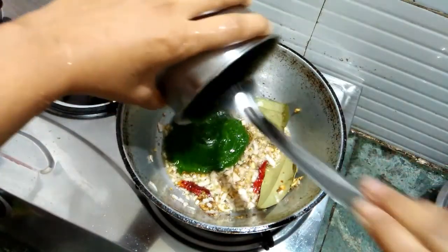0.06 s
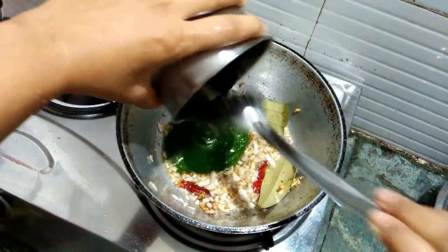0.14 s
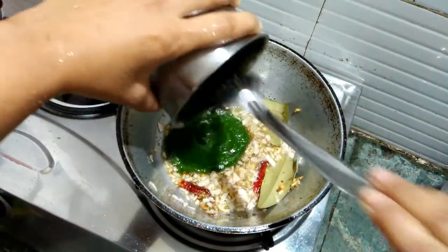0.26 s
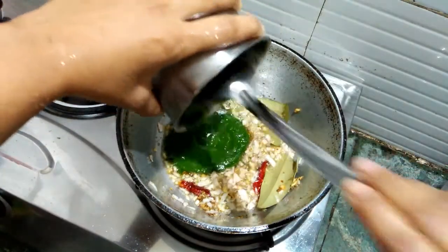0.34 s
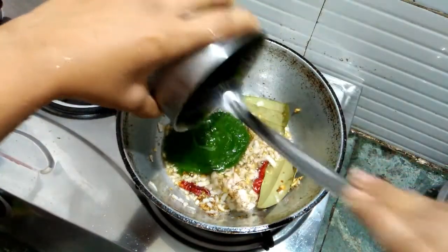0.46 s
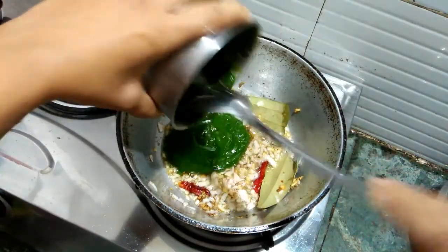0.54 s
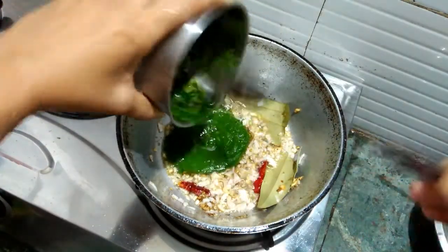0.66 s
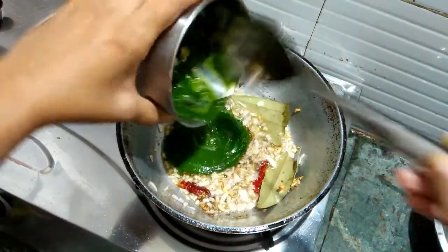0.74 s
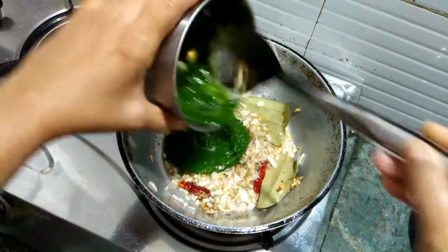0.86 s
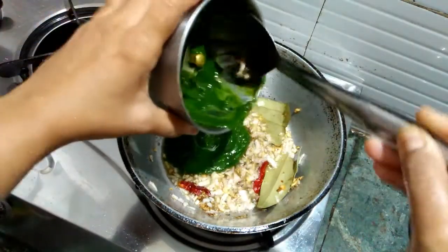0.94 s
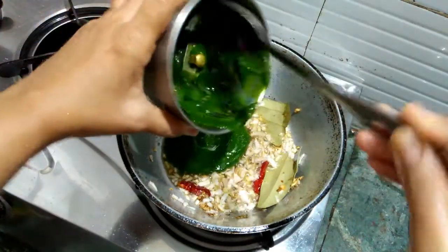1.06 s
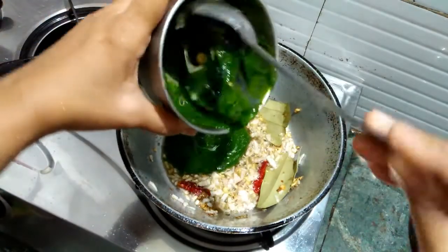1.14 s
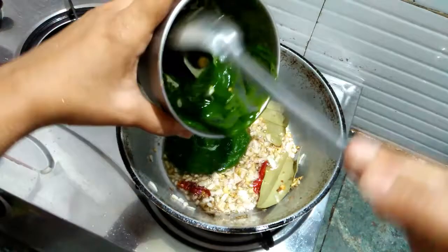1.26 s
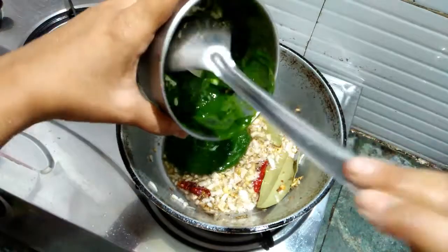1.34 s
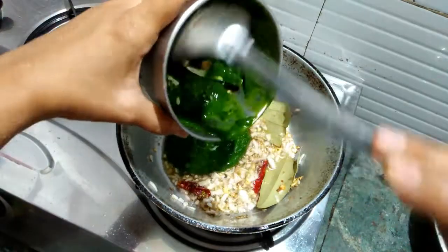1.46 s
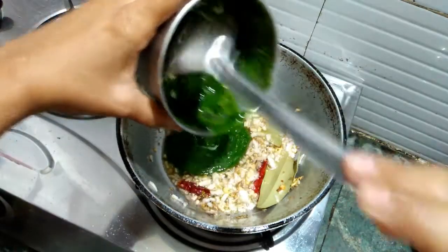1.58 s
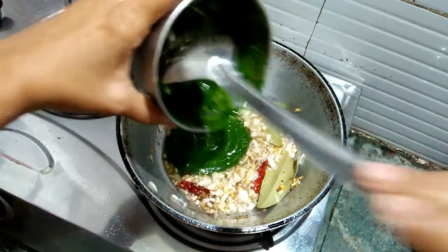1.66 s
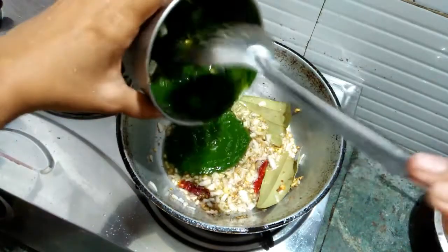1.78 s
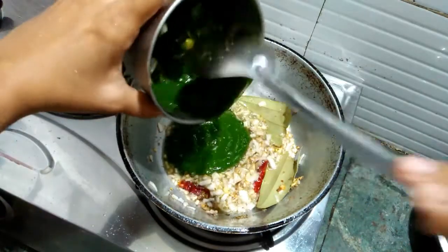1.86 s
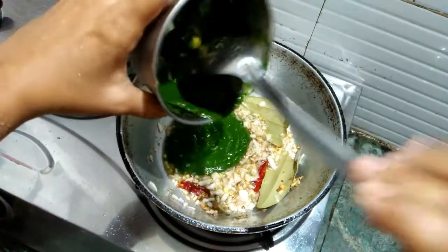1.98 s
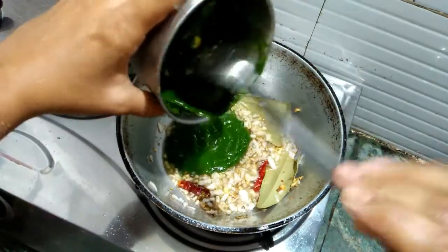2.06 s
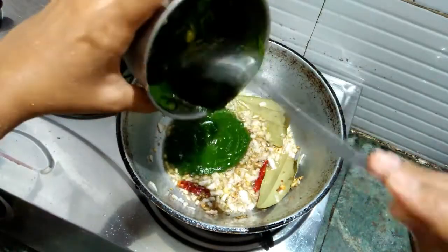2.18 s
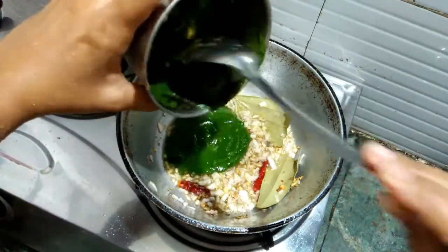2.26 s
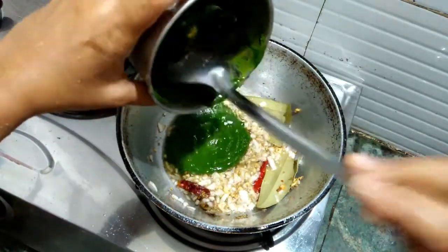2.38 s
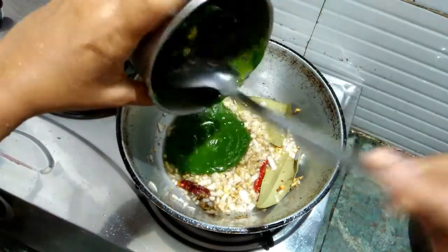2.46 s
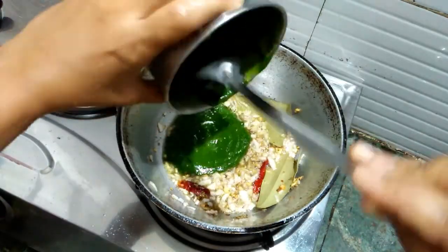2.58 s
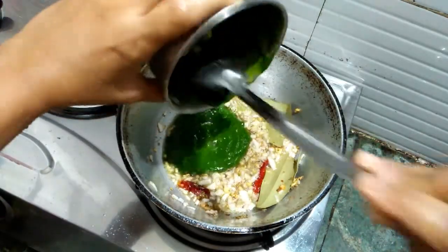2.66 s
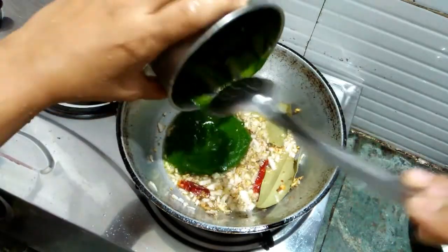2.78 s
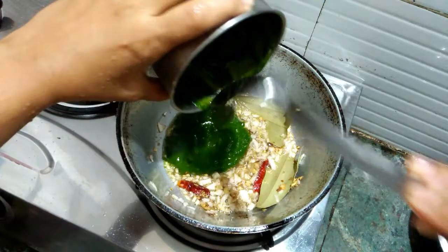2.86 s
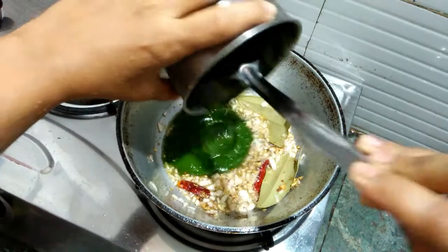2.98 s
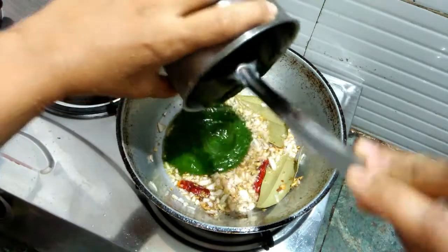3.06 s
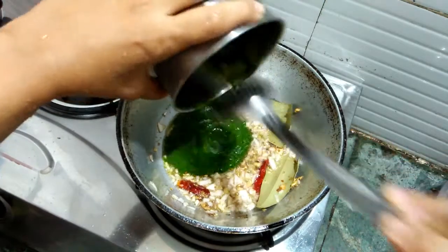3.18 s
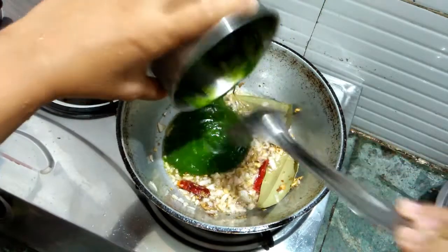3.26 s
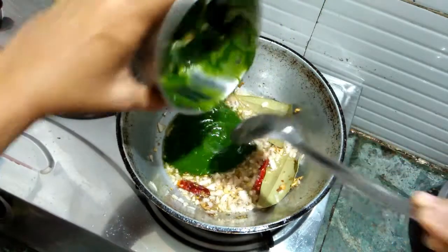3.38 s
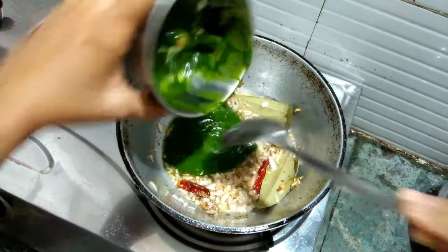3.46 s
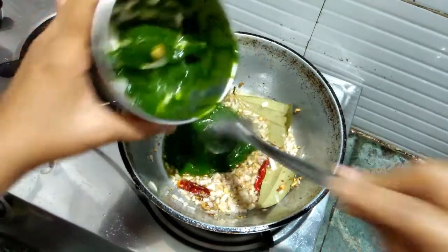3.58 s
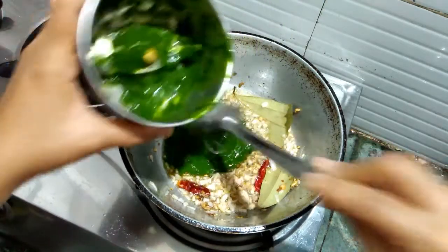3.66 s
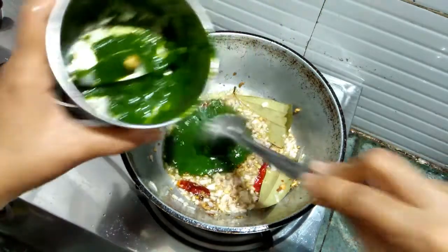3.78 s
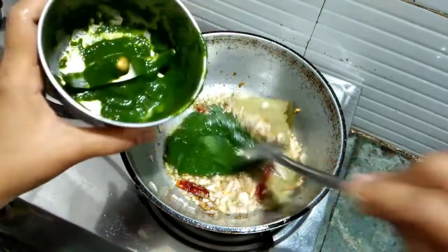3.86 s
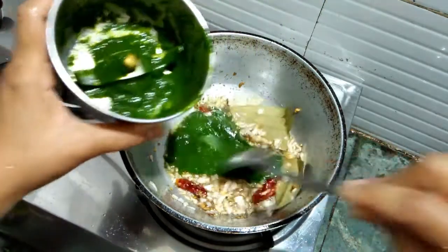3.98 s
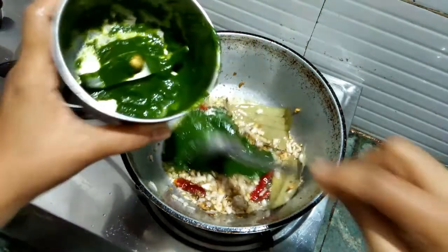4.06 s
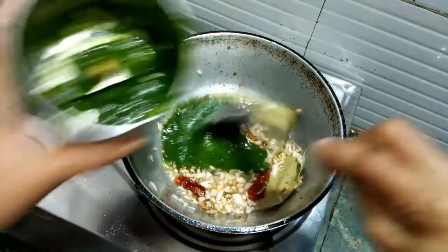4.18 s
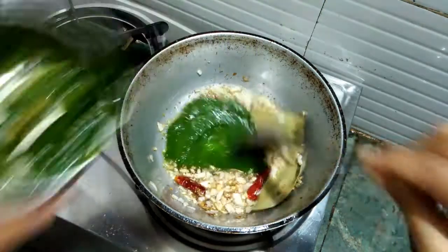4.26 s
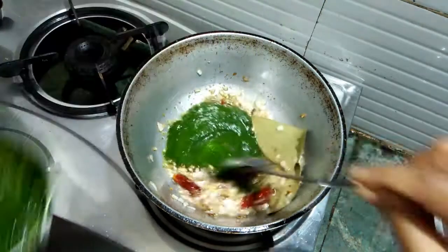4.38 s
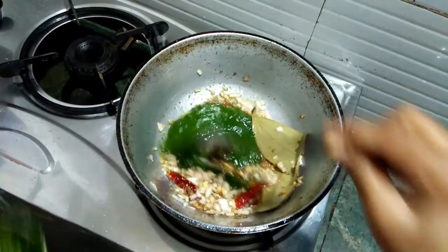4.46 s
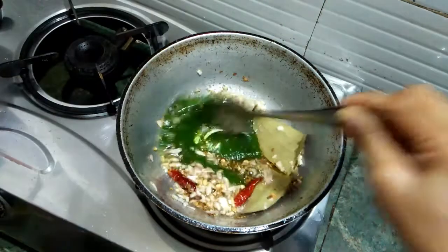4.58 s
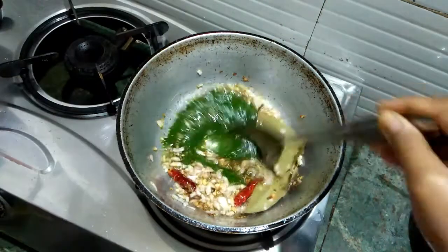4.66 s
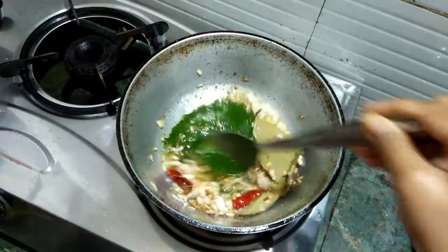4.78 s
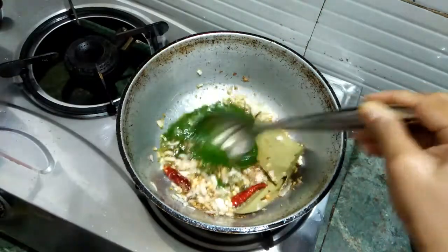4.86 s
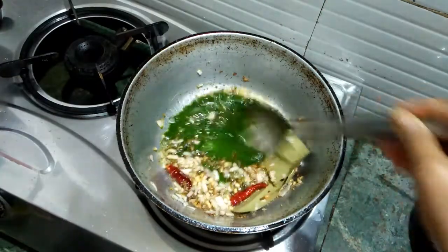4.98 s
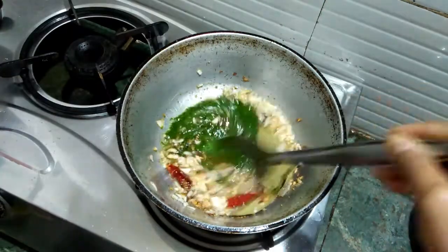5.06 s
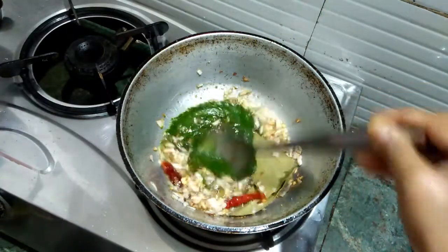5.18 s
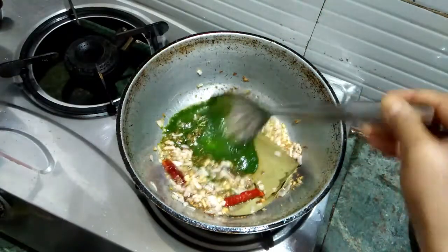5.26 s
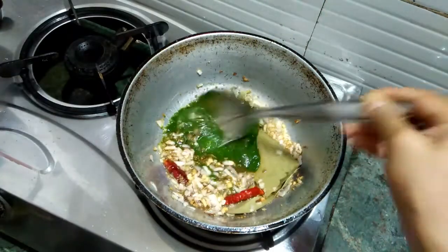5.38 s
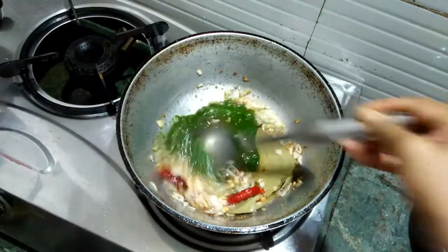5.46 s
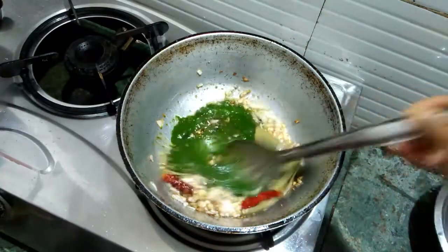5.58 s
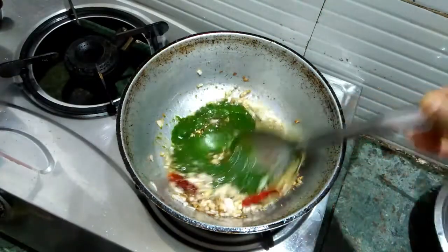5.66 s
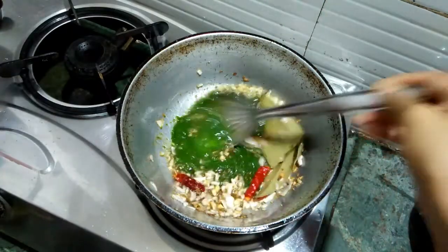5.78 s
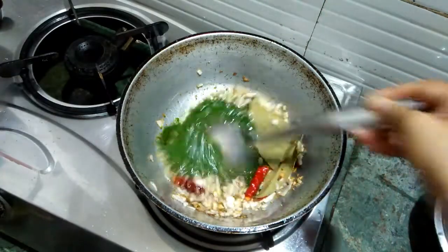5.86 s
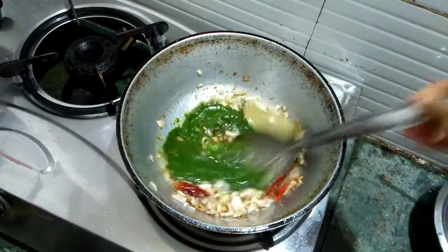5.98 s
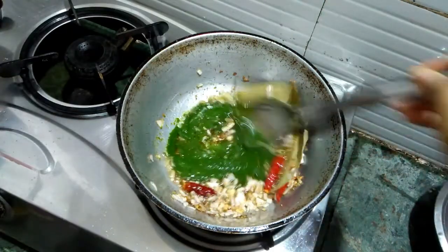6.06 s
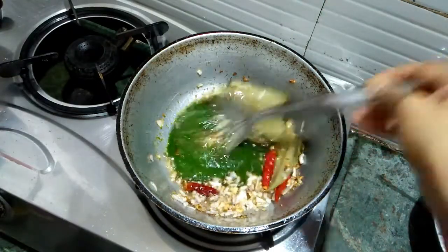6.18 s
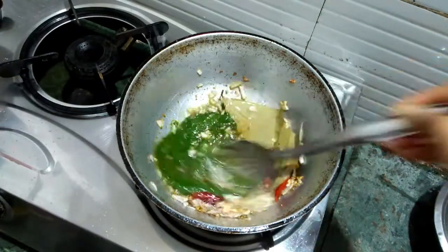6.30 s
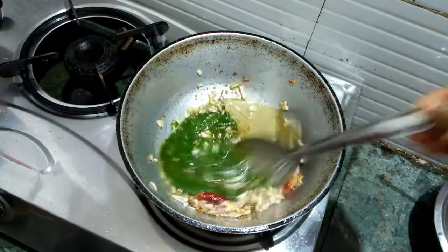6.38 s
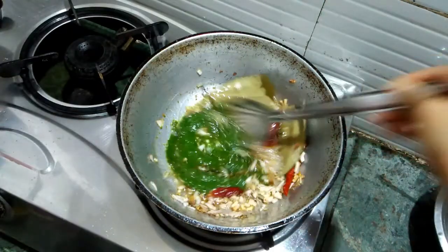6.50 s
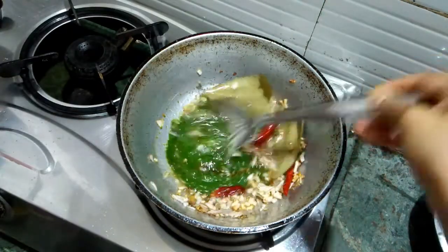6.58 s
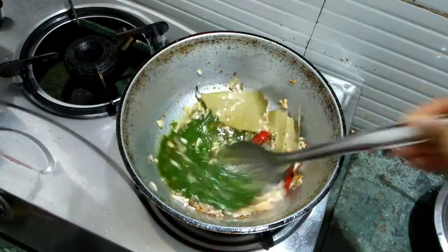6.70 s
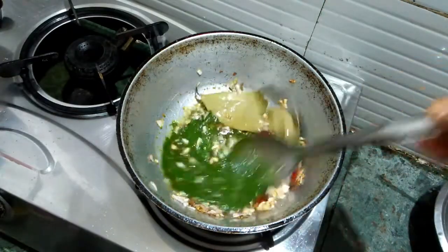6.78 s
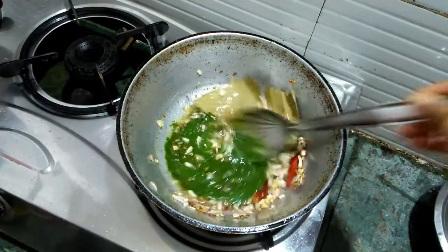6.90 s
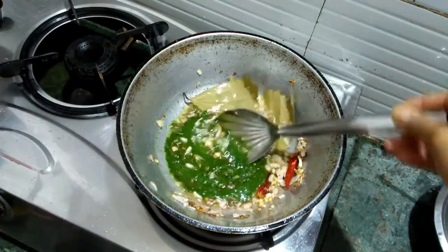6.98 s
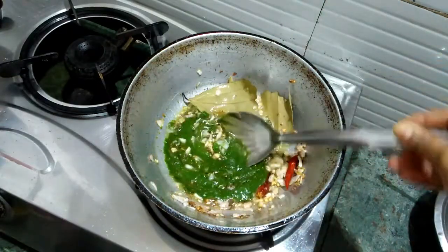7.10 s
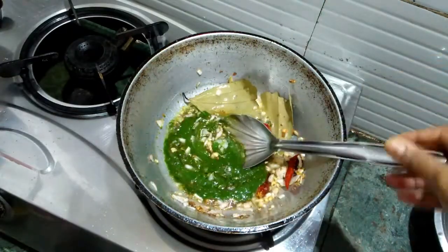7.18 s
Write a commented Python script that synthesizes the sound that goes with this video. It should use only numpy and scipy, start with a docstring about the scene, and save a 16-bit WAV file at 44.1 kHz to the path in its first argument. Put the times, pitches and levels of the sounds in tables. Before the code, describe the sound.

In a small tiled kitchen, a steel spoon clinks and scrapes thick puree out of a hand-held metal bowl, in quick irregular bursts. Then it knocks the heavier pan a few times and stirs in short rasping, slightly groaning strokes. A light wet sizzle with a few pops and squelches runs throughout, over low room noise. Close microphone, mono, short bright reflections.

```python
"""First a steel spoon clinks and scrapes puree out of a hand-held steel bowl, over a pan on the stove.
Each clink is a sum of fading tones with a burst of noise; each scrape is tiny slips that excite the metal.
Then the spoon knocks on the heavier pan and stirs: the strokes rasp, and the pan's base groans.
All along, the wet mixture sizzles lightly in tiny bursts, with a few pops and squelches made of noise.
Low room noise lies underneath, and a small tiled kitchen answers the metal, the groans, the fizz and the pops."""
import sys
import numpy as np
from scipy import signal
from scipy.fft import rfft, irfft, next_fast_len
from scipy.io import wavfile
from scipy.ndimage import map_coordinates

SR = 44100
rng = np.random.default_rng(int(sys.argv[2]) if len(sys.argv) > 2 else 0)


def store_wav(level_fs):
    """Save 16-bit WAV to argv[1]."""
    pcm = np.round(np.clip(np.atleast_2d(level_fs), -1, 1) * 32767)
    wavfile.write(sys.argv[1], SR, pcm.T.astype(np.int16))


N = 318843  # length of the scene in samples

# In all tables, t60 is the time to fade by 60 dB. Levels are relative: the functions trim or balance them.

# colour of the room noise: (frequency [Hz], level [dB])
AIR_SPECTRUM = [(15, -25), (25, -31), (44, -2.5), (161, -2), (233, -18.5), (293, -1.5), (360, -16.5),
                (434, -3.5), (522, -8.5), (971, 1), (1240, -3.5), (3500, -17), (4550, -14), (7700, -120)]
AIR_DB = -56  # rms level of the room noise
# how long the tiled kitchen answers: (frequency [Hz], t60 [s])
KITCHEN_DECAY = [(150, 1), (400, 0.41), (1000, 0.46), (3000, 0.37), (8000, 0.41), (15000, 0.34)]

# the mixture fries on its own, most when fresh puree has landed: (time [s], fizz level [dB])
FRYING = [(0, -49), (1.4, -50), (3.0, -47.5), (3.45, -45), (4.4, -45.5), (5.7, -48), (6.5, -48.5),
          (7.23, -59.5)]
# colour of the fizz and the pops: (frequency [Hz], level [dB])
HISS_SPECTRUM = [(1290, -17), (2200, -8), (2310, -9), (3470, -16), (4310, -10), (6060, -9), (9020, 2.5),
                 (11200, -5.5), (13800, -9), (16000, -25)]
# single wet pops in the puree and oil: (time [s], peak level [dB])
POPS = [(0.6325, -19.5), (3.483, -22.5), (3.7007, -25.5), (4.3116, -24), (6.237, -16.5), (6.5784, -24)]
# air pockets squelch out of the puree: (time [s], level [dB], frequency [Hz])
SQUELCHES = [(0.325, -40.5, 2860), (1.033, -40, 3370), (1.463, -49, 2760), (1.545, -40, 3360),
             (5.3076, -44, 3750), (5.7239, -41, 5600), (6.4044, -44, 4100), (7.16, -43.5, 4640)]

# strokes of the spoon in the pan: (time [s], length [s], rubbing level [dB], favoured resonance [Hz],
# wet smear level [dB], groan level of the base [dB])
PAN_STROKES = [(3.712, 0.1, -58, 885, -52, -72), (3.914, 0.15, -49.5, 870, -40, -49.5),
               (4.092, 0.04, -37, 780, -53, -39), (4.214, 0.055, -40.5, 766, -48, -44.5),
               (4.427, 0.16, -52, 1110, -63, -47), (4.59, 0.013, -29, 1450, -52, -57),
               (4.67, 0.16, -48.5, 1260, -50.5, -54), (4.992, 0.055, -38.5, 960, -66, -50),
               (5.09, .11, -45, 1810, -40.5, -45), (5.425, .07, -45, 1180, -43.5, -51),
               (5.512, 0.027, -31, 1530, -56, -48), (5.826, 0.044, -43.5, 980, -51, -72),
               (5.878, 0.028, -32, 990, -45, -68), (5.94, 0.14, -49, 1070, -43, -62.5),
               (6.189, 0.086, -42, 1930, -43, -58.5), (6.267, 0.14, -49.5, 925, -48, -58.5),
               (6.525, 0.13, -46.5, 1040, -41, -59), (6.668, 0.029, -38, 910, -62, -52),
               (6.723, 0.025, -46, 2100, -52, -70), (6.947, 0.17, -82, 990, -48.5, -86)]
# strokes of the spoon in the bowl: (time [s], length [s], rubbing level [dB], favoured resonance [Hz],
# wet smear level [dB])
BOWL_STROKES = [(0.0, 0.025, -21.5, 2180, -35), (0.145, 0.031, -32.5, 2160, -35),
                (0.53, .17, -43.5, 2100, -44.5), (1.0, 0.16, -41.5, 1010, -45), (1.16, .16, -42, 877, -49),
                (1.37, 0.014, -35, 894, -60), (1.465, 0.025, -38, 940, -48), (1.72, 0.28, -48.5, 1010, -51),
                (2.14, 0.35, -40, 1440, -47), (2.52, 0.22, -33.5, 1860, -52), (2.77, 0.067, -38, 2390, -38),
                (3.21, 0.1, -42, 2100, -37.5)]
# a rubbing stroke builds up, holds, then lets go: (attack [s], release t60 [s])
RUB_SHAPE = (0.011, 0.19)
# the same for the wet smear of a stroke: (attack [s], release t60 [s])
SMEAR_SHAPE = (0.015, 0.38)
# colour of the rubbing in the pan: (frequency [Hz], level [dB])
PAN_GRIT = [(350, -56), (600, 3.5), (642, -17), (692, 2), (751, -5.5), (893, 0.5), (1080, 4), (1330, 3.5),
            (1580, 2), (1750, 0), (3600, -21), (4680, -67), (7920, -120)]
# colour of the rubbing in the bowl: (frequency [Hz], level [dB])
BOWL_GRIT = [(290, -58), (500, -7), (745, -0.5), (870, -5.5), (1150, 9.5), (1320, -5.5), (1440, 6.5),
             (1710, 6.5), (2080, -5), (3500, -11), (4550, -43), (7700, -120)]
# colour of the groaning pan base: (frequency [Hz], level [dB])
GROAN_SPECTRUM = [(150, -32), (330, -37), (440, 8.5), (490, 6.5), (600, -54), (1200, -36)]

# spoon on pan: (time [s], body level [dB], bright clash level [dB], rim tone [Hz],
# tone of the struck spot [Hz], its level [dB])
KNOCKS = [(3.81, -12, -8.5, 1680, 814, -15.5), (4.074, -22, -21.5, 2295, 964, -29),
          (4.412, -29.5, -40.5, 2283, 1216, -29), (4.602, -44, -42.5, 1580, 1535, -39),
          (4.783, -16, -18, 3470, 1072, -10.5), (4.836, -22, -23, 3210, 1065, -14.5),
          (4.982, -33.5, -44, 2207, 795, -27.5), (5.437, -39, -42.5, 2100, 1135, -35)]
# the pan rocks on its burner: (time [s], frequency [Hz], level [dB], t60 [s])
ROCK = [(4.787, 107, -25.5, 0.58), (4.786, 179, -31.5, 0.3)]
# modes (natural tones) of the pan with the spoon: (frequency [Hz], level [dB], t60 [s])
PAN_MODES = [(471, -12, 0.82), (760, -4, 0.51), (889, 6.5, 0.2), (1049, 9, 0.2), (1055, 1.5, 0.17),
             (1734, 16.5, 0.1), (1900, -1, 0.27), (2380, 14.5, 0.15), (3440, -9, 0.12), (3700, 2, 0.2),
             (3900, 5, 0.31), (5280, -4, 0.19), (6050, 7, .35), (6600, -22, .35), (6800, -11, .4),
             (8120, 0.5, 0.35), (9100, 4.5, 0.33), (10230, -1, 0.35)]

# spoon on bowl: (time [s], wall's lowest mode [Hz], its level [dB], rim tone [Hz], its level [dB],
# favoured high mode [Hz], bright clash level [dB], lingering ring against the blow [dB])
CLINKS = [(0.03, 1168, -16.5, 2130, -15.5, 3030, -22.5, -44),
          (0.431, 1253, -23, 2130, -26.5, 9060, -29.5, -13),
          (0.464, 1230, -18, 2140, -16.5, 7550, -19.5, -26),
          (0.79, 1100, -25, 2780, -27.5, 8230, -7.5, -22), (0.96, 1098, -10, 3280, -25.5, 3460, -18, -26),
          (1.077, 1145, -29.5, 3340, -49, 8500, -39, -25), (1.131, 1103, -32.5, 3460, -50, 3900, -28, -34),
          (1.577, 1004, -14, 2560, -44, 8270, -28.5, -16), (1.66, 1088, -18.5, 2954, -23, 8400, -15, -32),
          (1.711, 980, -37, 2276, -20.5, 8390, -11, -35), (2.042, 1490, -23.5, 3390, -37, 8750, -20, -27),
          (2.062, 1214, -24.5, 3380, -30, 8255, -9.5, -38), (2.092, 1034, -20, 2050, -27.5, 8270, -29, -37),
          (2.155, 1066, -19.5, 2050, -33.5, 8920, -35, -27),
          (2.207, 1175, -21.5, 2580, -30, 8920, -55, -32),
          (2.278, 1080, -31.5, 1980, -21, 8900, -12.5, -31), (2.294, 1120, -25, 2110, -19, 8850, -12, -19),
          (2.358, 1051, -20.5, 3250, -31, 8700, -25, -20), (2.383, 1130, -32, 2080, -34, 8850, -31, -29),
          (2.48, 1103, -17, 2110, -19.5, 8900, -26, -48), (2.589, 1152, -18, 2240, -19, 8740, -6.5, -34),
          (2.626, 1075, -17.5, 3230, -18.5, 10000, -12, -19), (3.06, 1140, -23, 2060, -21, 10140, -24, -17),
          (3.071, 1030, -18.5, 2240, -17.5, 4390, -17.5, -37),
          (3.208, 1150, -32, 2076, -29, 9900, -34, -15)]
# the bowl wall's shifting modes: (multiple of its lowest mode [ratio], level [dB], t60 [s])
WALL_MODES = [(1, 12, 0.28), (3.07, -4, 0.24)]
# steady modes of the bowl with the spoon: (frequency [Hz], level [dB], t60 [s])
BOWL_MODES = [(1287, -6, 0.21), (1483, 5, 0.39), (1960, -13, 0.27), (2100, 11, 0.17), (2083, 4, 0.78),
              (2180, -7.5, 0.4), (2480, -19, 0.34), (3096, 2, 0.3), (4270, 0, 0.11), (5190, 3, 0.11),
              (5510, -5, 0.32), (5990, -1, 0.2), (7400, -21, .25), (8240, -22, .25), (8500, 0, 0.4),
              (8160, -27, .3), (9200, 8, 0.21), (9470, -14.5, 0.27), (9970, 3.5, 0.33), (10550, -14, .3),
              (11490, -1, 0.22), (12330, -3, .2)]
# a harder clash chatters longer: seconds at a 0 dB clash, and dB of length per dB of clash
HARD_CHATTER_S, CHATTER_GROWS = 0.00425, 0.48

# colour of the crack when metal meets metal: (frequency [Hz], level [dB])
CRACK_SPECTRUM = [(30, -23), (70, -11.5), (150, -20), (400, -13), (800, -3.5), (2000, 17), (4500, 4),
                  (9000, 3), (13000, -6.5), (16000, -11.5)]
# bands in which a blow's starting strength is set: (low edge [Hz], high edge [Hz])
BANDS = [(150, 750), (750, 1500), (1500, 3000), (3000, 7000), (7000, 15000)]
TOP_HZ = 16000  # nothing passes above this


def amp(db):
    """Turns decibels into gain."""
    return 10 ** (np.asarray(db) / 20)


def unit(x):
    """Scales x to rms 1, a common measure of average strength."""
    return x / np.sqrt(np.mean(x ** 2) + 1e-20)


def fade(t, t60):
    """A decay that loses 60 dB in t60 seconds."""
    return np.exp(-np.log(1000) * t / t60)


def along(points, hz):
    """Reads a curve of (Hz, value) points, with straight lines over log frequency."""
    point_hz, values = np.transpose(points)
    return np.interp(np.log(hz + 1), np.log(point_hz + 1), values)


def wobble(rate):
    """A smooth random curve with `rate` random points a second."""
    knots = rng.standard_normal(int(N * rate / SR) + 4)
    return map_coordinates(knots, [np.arange(N) * rate / SR])


def filtered(x, response):
    """Multiplies the spectrum of x by a response that depends on frequency."""
    size = next_fast_len(len(x) + 4096)
    spectrum = rfft(x, size) * response(np.fft.rfftfreq(size, 1 / SR))
    return irfft(spectrum, size)[:len(x)]


def coloured(x, spectrum):
    """Shapes x with a (Hz, dB) spectrum, at rms 1."""
    return unit(filtered(x, lambda hz: amp(along(spectrum, hz))))


def add(track, s, sound):
    """Mixes a sound into a track at time s in seconds."""
    part = track[max(round(s * SR), 0):][:len(sound)]
    part += sound[:len(part)]


def grains(rate, spread_db):
    """Random tiny impulses of uneven size, about `rate` a second, at rms 1."""
    unevenness = amp(spread_db * np.clip(rng.standard_normal(N), -2, 2))
    sizes = rng.standard_normal(N) * unevenness
    return unit(sizes * (rng.random(N) < rate / SR))


def tone(hz, t60, attack_s):
    """One freely decaying mode: a sine wave that starts quickly and fades."""
    t = np.arange(SR) / SR
    return np.sin(2 * np.pi * hz * t) * fade(t, t60) * (1 - np.exp(-t / attack_s))


def stroke(length_s, shape):
    """One second of a stroke's loudness: attack, hold, release."""
    attack_s, release_t60 = shape
    t = np.arange(SR) / SR
    return (1 - np.exp(-t / attack_s)) * fade(np.maximum(t - length_s, 0), release_t60)


def strokes(rows, shape, lead_s):
    """Gain over time from (s, length s, dB) strokes; the spoon touches a moment before each."""
    gain = np.zeros(N)
    for s, length_s, db in rows:
        add(gain, s - lead_s, amp(db) * stroke(length_s, shape))
    return gain


def room_air():
    """The low rush of the room: steady coloured noise."""
    return amp(AIR_DB) * coloured(rng.standard_normal(N), AIR_SPECTRUM)


def kitchen(x, wet_db):
    """Adds the answer of the tiled walls: a noise tail whose fading time depends on frequency."""
    hz, t, noise = signal.stft(rng.standard_normal(SR // 2), SR, nperseg=256)
    decay = fade(t, along(KITCHEN_DECAY, hz)[:, None])
    tail = signal.istft(noise * decay * (1 - np.exp(-t / 0.0014)), SR, nperseg=256)[1]
    answer = signal.fftconvolve(x, tail / np.linalg.norm(tail))[:len(x)]
    return x + amp(wet_db) * answer


def sizzle(fizz_db=0.4, smear_db=1, pop_db=2):
    """Dense tiny bursts in the wet mixture swell with every stroke; a few pop out singly."""
    ticks = grains(rate=12000, spread_db=2)
    bursts = coloured(ticks, HISS_SPECTRUM) * amp(wobble(35))
    frying = amp(fizz_db + np.interp(np.arange(N) / SR, *np.transpose(FRYING)))
    smears = [(s, length_s, db) for s, length_s, _, _, db, *_ in [*BOWL_STROKES, *PAN_STROKES]]
    smearing = amp(smear_db) * strokes(smears, SMEAR_SHAPE, lead_s=0.02)
    # the powers of the two fizzes add up
    fizz = np.hypot(frying, smearing) * unit(kitchen(bursts, wet_db=-13))

    pops = np.zeros(N)
    t = np.arange(SR // 50) / SR
    for s, db in POPS:
        snap = coloured(rng.standard_normal(len(t)), HISS_SPECTRUM) * fade(t, 0.0052)
        add(pops, s + 0.0011, amp(db + pop_db) * snap / np.abs(snap).max())
    return fizz + kitchen(pops, wet_db=-11.0)


def squelches(width=0.1, swell_s=0.0061, trim_db=-7):
    """Small wet cavities open and resonate for a moment: narrow noise that swells and dies."""
    out = np.zeros(N)
    t = np.arange(SR // 12) / SR
    swell = t / swell_s * np.exp(1 - t / swell_s)
    for s, db, hz in SQUELCHES:
        noise = rng.standard_normal(len(t))
        cavity = unit(filtered(noise, lambda f: 1 / (1 + ((f / hz - 1) / width) ** 2)))
        add(out, s, amp(db + trim_db) * cavity * swell)
    return out


def resonant(x, modes, width_hz):
    """Passes x through the modes of a body, widened by the spoon's pressure."""
    def response(f):
        total = 0
        for k, (centre, db, _) in enumerate(modes):
            damping = 1j * f * width_hz
            # every other mode is turned upside down
            total = total + (-1) ** k * amp(db) * damping / (centre ** 2 - f ** 2 + damping)
        return total
    return unit(filtered(x, response))


def scraping(rows, modes, grit, slip_rate, width_hz, ring_db, focus_db, focus_width_hz):
    """Tiny slips under the spoon excite the metal, most near the resonance each stroke favours."""
    slips = grains(slip_rate, spread_db=4) * amp(2.6 * wobble(55))
    rub = coloured(slips, grit)
    body = rub + amp(ring_db) * resonant(rub, modes, width_hz)
    # one more second, so that late strokes have enough material
    body = np.pad(body, (0, SR), mode="wrap")
    slips = np.pad(slips, (0, SR), mode="wrap")
    out = np.zeros(N)
    for s, length_s, db, hz, *_ in rows:
        start = max(round(s * SR), 0)
        piece = slips[start:][:SR]
        focus = unit(filtered(piece, lambda f: 1 / (1 + 2j * (f - hz) / focus_width_hz) ** 2))
        scrape = unit(body[start:][:SR] + amp(focus_db) * focus)
        add(out, s - .008, amp(db) * stroke(length_s, RUB_SHAPE) * scrape)
    return kitchen(out, wet_db=-6.5)


def stirring(grit_db=-1):
    """Each stroke rasps over the pan and makes its base groan in fits."""
    rasp = scraping(PAN_STROKES, PAN_MODES, PAN_GRIT, slip_rate=1400, width_hz=64,
                    ring_db=-5.5, focus_db=-1.5, focus_width_hz=370)
    groan_rows = [(s, length_s, db) for s, length_s, *_, db in PAN_STROKES]
    pressure = strokes(groan_rows, RUB_SHAPE, lead_s=0.019)
    judder = unit(amp(5 * wobble(45)))
    groan = pressure * judder * coloured(grains(rate=4800, spread_db=-0.5), GROAN_SPECTRUM)
    return amp(grit_db) * rasp + kitchen(groan, wet_db=-14)


def cushion(centre_hz, t60):
    """The soft push of the spoon through food just before metal meets metal."""
    t = np.arange(SR // 25) / SR
    spectrum = [(centre_hz / 4, -35), (centre_hz, 0), (centre_hz * 2, -12), (centre_hz * 8, -35)]
    push = coloured(rng.standard_normal(len(t)), spectrum)
    return push * fade(t, t60) * (1 - np.exp(-t / 0.00027))


def rim(hz, split=0.022, usual_hz=2130, usual_t60=0.25, tilt_db=9):
    """The rim's tone outlasts the contact: a main tone beats with three randomly placed close neighbours."""
    # higher rim tones start stronger (tilt in dB an octave) and die sooner
    t60 = usual_t60 * (usual_hz / hz) ** 2.4
    neighbours_hz = hz * (1 + split * rng.standard_normal(3))
    neighbours = sum(tone(f, t60 * .7, attack_s=.001) for f in neighbours_hz)
    cluster = .8 * tone(hz, t60, attack_s=.003) + .3 * neighbours
    return amp(tilt_db * np.log2(hz / usual_hz)) * cluster


def strike(modes, band_db, ring_db, contact_t60, crack_db, crack_t60, chatter_s):
    """One blow: the spoon chatters briefly and damps the metal, then a faint free ring lingers."""
    t = np.arange(SR * 3 // 5) / SR
    hz, db, t60 = np.transpose(modes)[:, :, None]
    luck, phase, detune = rng.standard_normal((3, len(modes), 1))
    # each blow varies at random in pitch and level, the high modes most
    chance = np.clip(hz / 6000, .3, 1)
    hz = hz * (1 + .009 * chance * detune)
    db = db + 3 * chance * luck
    after = np.maximum(t - chatter_s, 0)
    decay = fade(after, contact_t60) + amp(ring_db) * fade(t, t60)
    ring = np.sum(amp(db) * decay * np.sin(2 * np.pi * (hz * t + phase)), axis=0)
    noise = coloured(rng.standard_normal(len(t)), CRACK_SPECTRUM)
    crack = amp(crack_db) * noise * fade(after, crack_t60)
    blow = (ring + crack) * (1 - np.exp(-t / 0.00085))

    # the place and hardness of the contact set how strongly each band starts
    onset = blow[:SR // 100]
    gains = []
    for (low, high), wanted_db in zip(BANDS, band_db):
        in_band = filtered(onset, lambda f: (f > low) & (f < high))
        gain_db = wanted_db - 20 * np.log10(np.sqrt(np.mean(in_band ** 2)))
        # hold the gain across the band and glide between bands
        gains += [(low * 1.15, gain_db), (high / 1.15, gain_db)]
    return filtered(blow, lambda f: amp(along(gains, f)))


def pan_knocks(trim_db=(-9, -3.5, -6.5, -7, -3), body_share=0.73, rim_tone_db=-12, spot_t60=0.071,
               low_cut_hz=120, cushion_db=-11, lag_s=0.0019):
    """The spoon hits the heavier pan; the struck spot sings briefly, and once the pan rocks with a low hum."""
    out = np.zeros(N)
    for s, body_db, clash_db, rim_hz, spot_hz, spot_db in KNOCKS:
        middle_db = body_share * body_db + (1 - body_share) * clash_db
        band_db = np.add([body_db, body_db, middle_db, clash_db, clash_db], trim_db)
        blow = strike(PAN_MODES, band_db, ring_db=-22.5, contact_t60=0.019,
                      crack_db=17, crack_t60=0.035, chatter_s=0.00078)
        blow = filtered(blow, lambda f: (1j * f / (low_cut_hz + 1j * f)) ** 2)
        rim_tone = amp(body_db + rim_tone_db) * rim(rim_hz)
        spot_tone = amp(spot_db) * tone(spot_hz, spot_t60, attack_s=0.00067)
        tones = rim_tone + spot_tone
        add(out, s + lag_s, kitchen(blow + tones[:len(blow)], wet_db=-3.5))
        add(out, s - .004, amp(body_db + cushion_db) * cushion(centre_hz=474, t60=0.02))
    for s, hz, db, t60 in ROCK:
        add(out, s, amp(db) * tone(hz, t60, attack_s=0.014))
    return out


def bowl_scrapes(trim_db=-6.0):
    """The spoon slips along the bowl in tiny jerks that make its metal sound."""
    rub = scraping(BOWL_STROKES, BOWL_MODES, BOWL_GRIT, slip_rate=900, width_hz=66,
                   ring_db=-7.0, focus_db=0, focus_width_hz=200)
    return amp(trim_db) * rub


def bowl_clinks(trim_db=(-24, -3.5, -3.5, -9, -4), wall_share=0.18, rim_tone_db=-5.5,
                ping_db=-8, ping_t60=0.098, cushion_db=-20, lag_s=.002):
    """The spoon hits the bowl; grip, puree and place of contact shift wall modes, rim tone and a high ping."""
    out = np.zeros(N)
    for s, wall_hz, wall_db, rim_hz, rim_db, ping_hz, clash_db, ring_db in CLINKS:
        wall_modes = [(wall_hz * ratio, mode_db, t60) for ratio, mode_db, t60 in WALL_MODES]
        modes = wall_modes + list(BOWL_MODES)
        overtone_db = wall_share * wall_db + (1 - wall_share) * clash_db
        band_db = np.add([clash_db, wall_db, rim_db, overtone_db, clash_db], trim_db)
        chatter_s = HARD_CHATTER_S * amp(CHATTER_GROWS * clash_db)
        blow = strike(modes, band_db, ring_db, contact_t60=0.032,
                      crack_db=14.5, crack_t60=0.051, chatter_s=chatter_s)
        rim_tone = amp(rim_db + rim_tone_db) * rim(rim_hz)
        ping = amp(clash_db + ping_db) * tone(ping_hz, ping_t60, attack_s=0.00033)
        tones = rim_tone + ping
        add(out, s + lag_s, kitchen(blow + tones[:len(blow)], wet_db=-7.5))
        add(out, s - .005, amp(wall_db + cushion_db) * cushion(centre_hz=1060, t60=0.039))
    return out


def scene():
    """Room noise, wet mixture, pan and bowl together, on one channel."""
    mixture = sizzle() + squelches()
    pan = stirring() + pan_knocks()
    bowl = bowl_scrapes() + bowl_clinks()
    return (room_air() + mixture + pan + bowl)[None]


def record(dry):
    """The loudest peaks are rounded off, and nothing passes above the band limit."""
    rounded = dry[0] / (1 + np.abs(dry[0]) ** 4) ** (1 / 4)
    return filtered(rounded, lambda hz: hz < TOP_HZ)[None]


dry = scene()
out = record(dry)
store_wav(out)
```